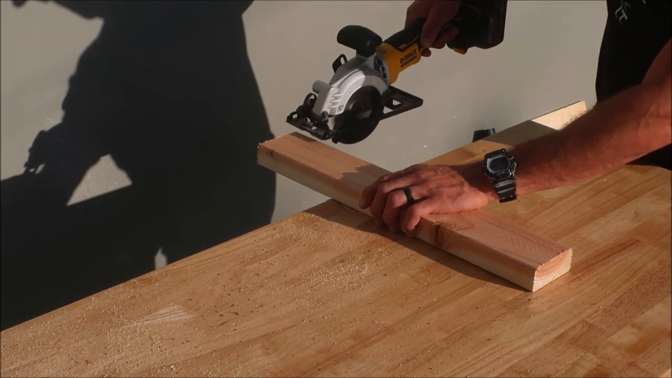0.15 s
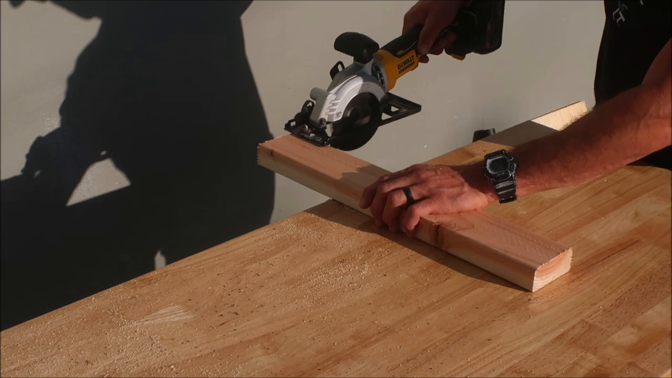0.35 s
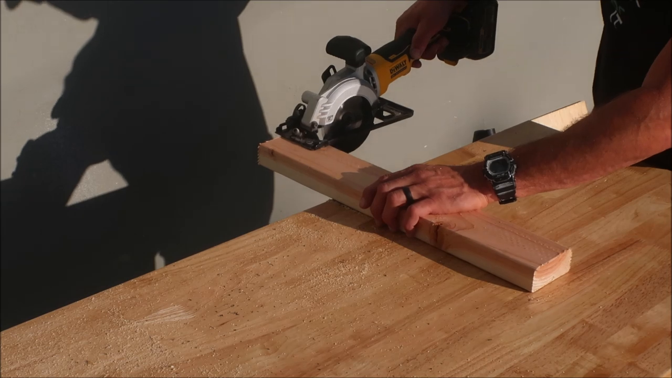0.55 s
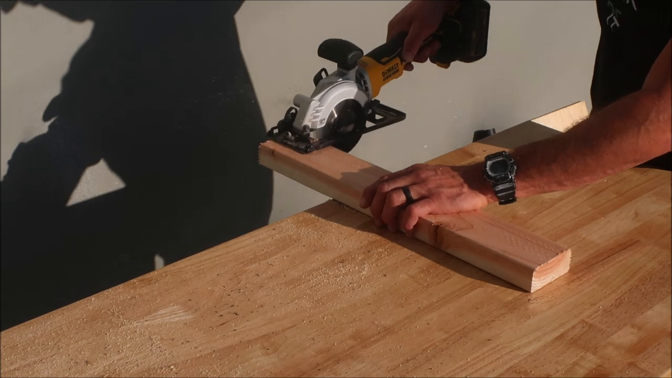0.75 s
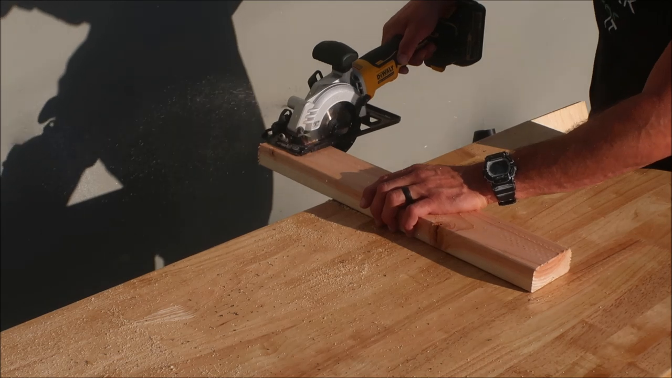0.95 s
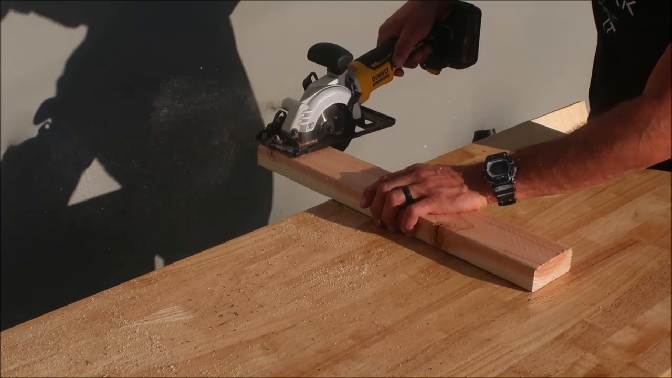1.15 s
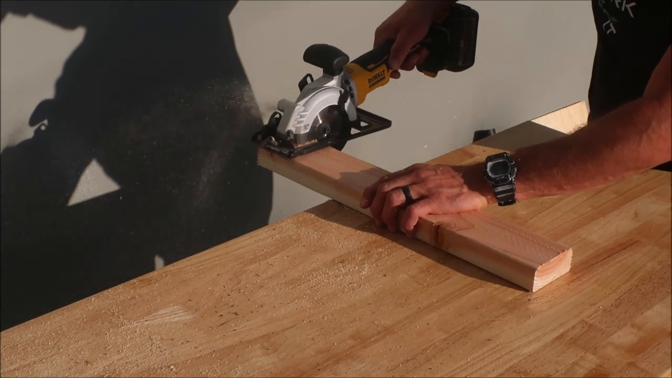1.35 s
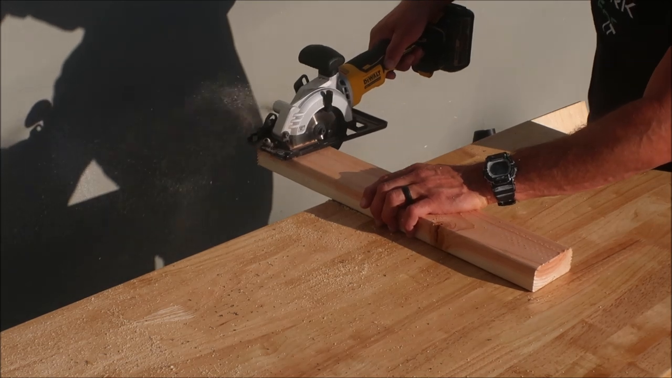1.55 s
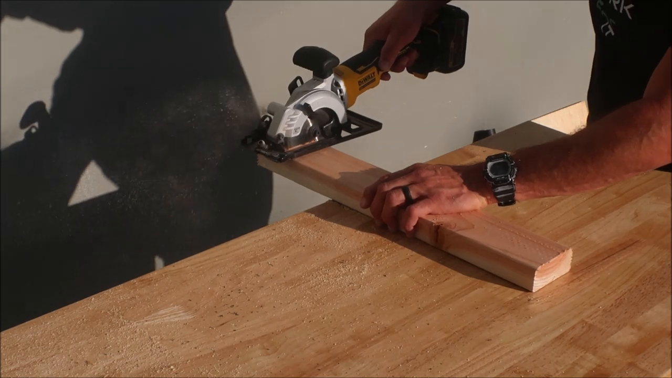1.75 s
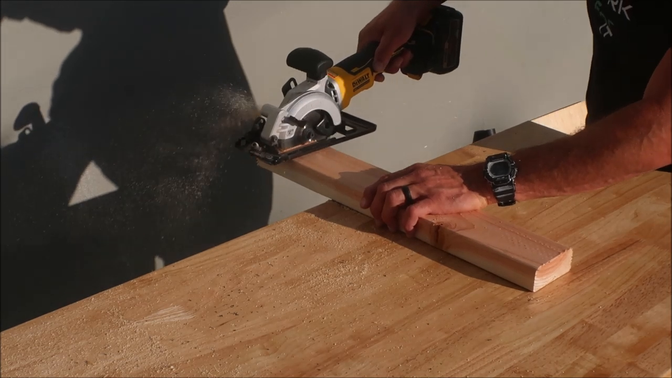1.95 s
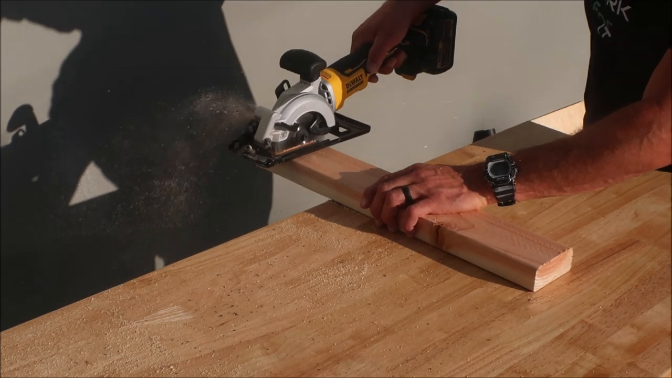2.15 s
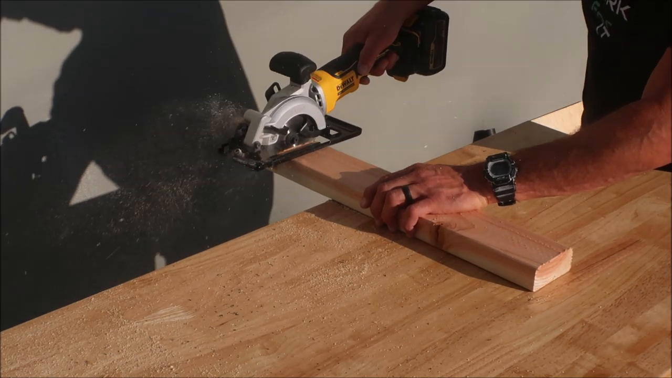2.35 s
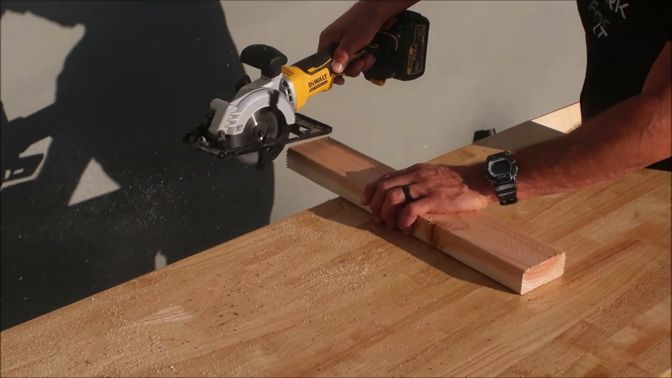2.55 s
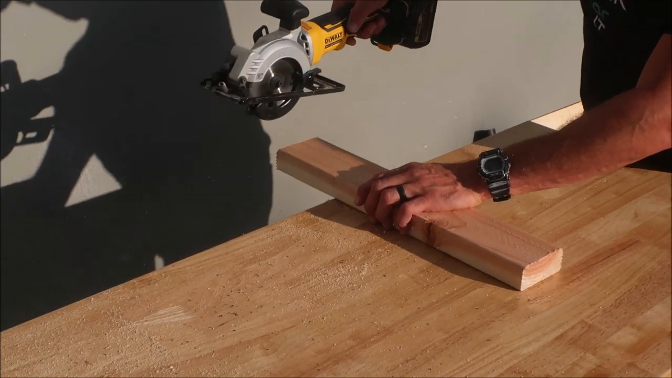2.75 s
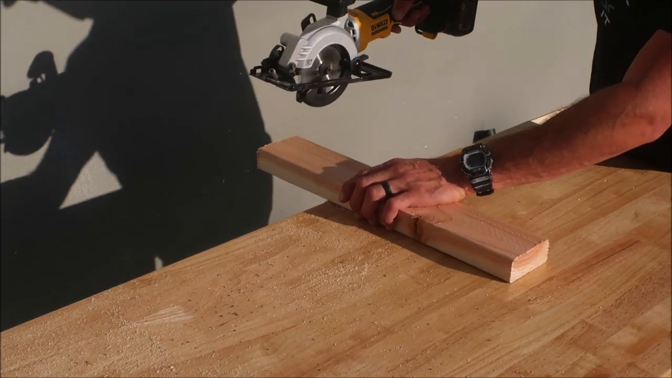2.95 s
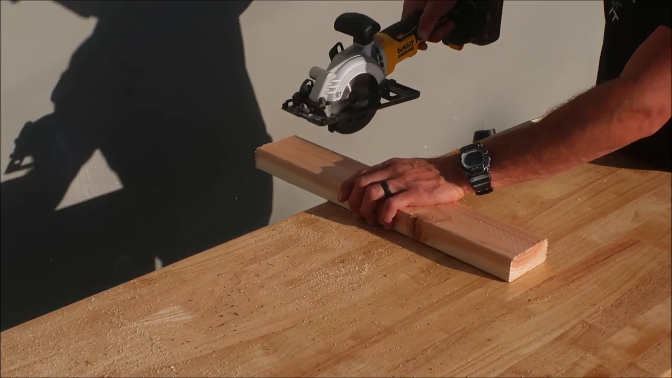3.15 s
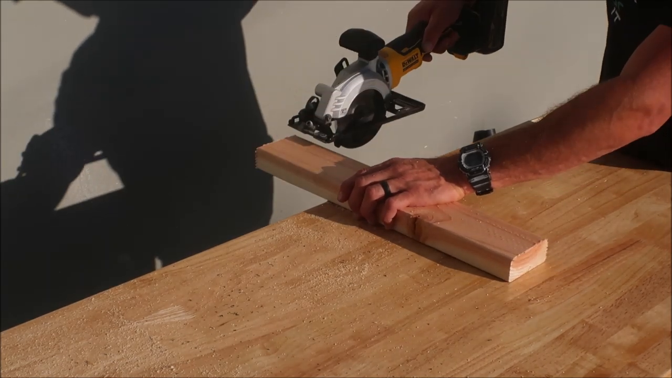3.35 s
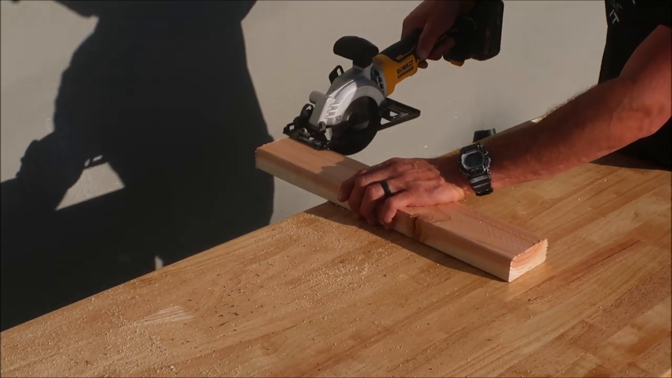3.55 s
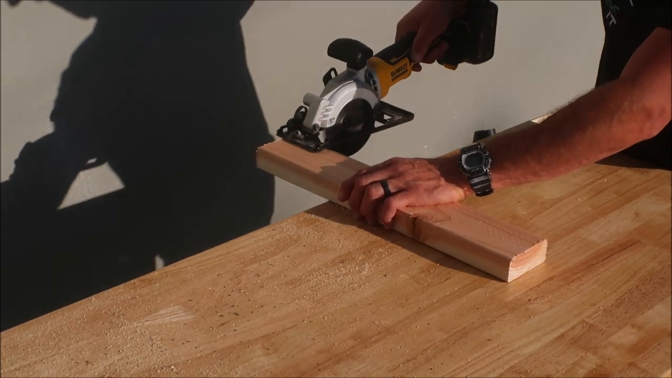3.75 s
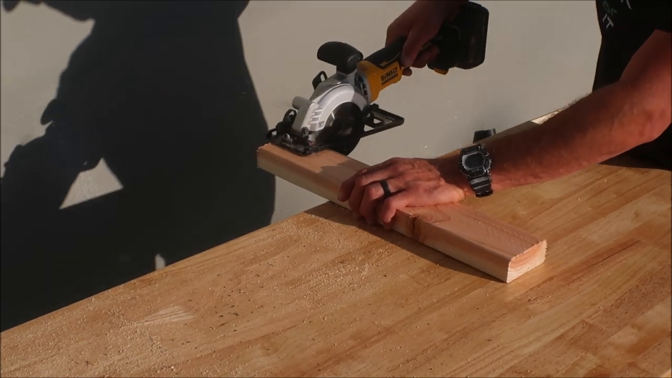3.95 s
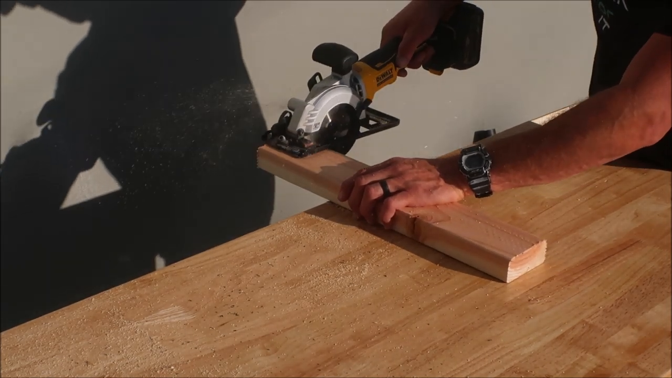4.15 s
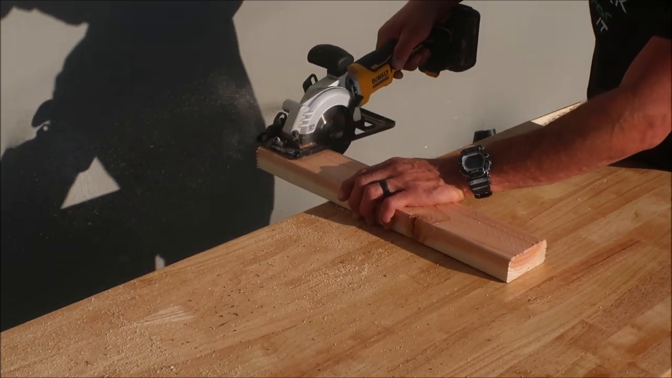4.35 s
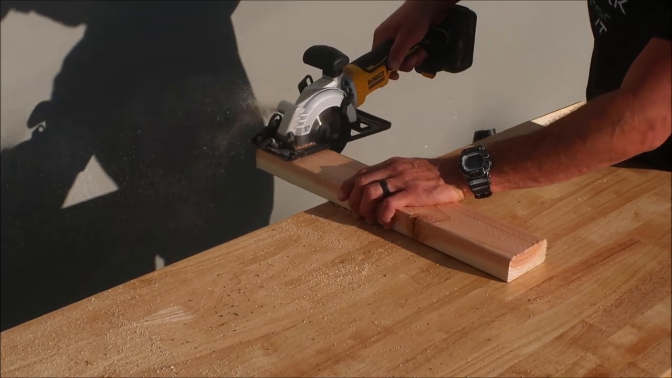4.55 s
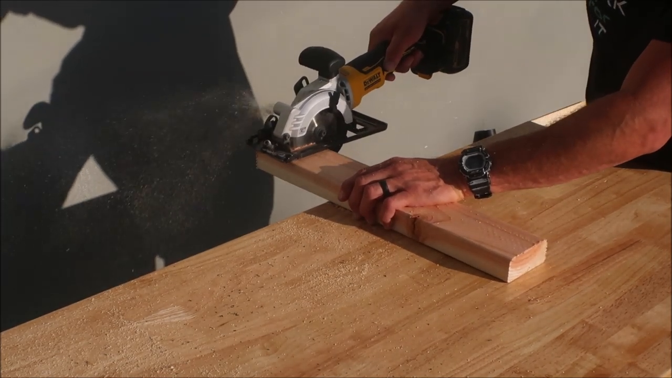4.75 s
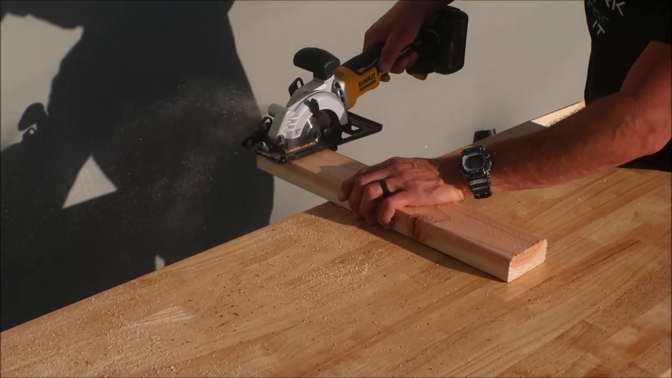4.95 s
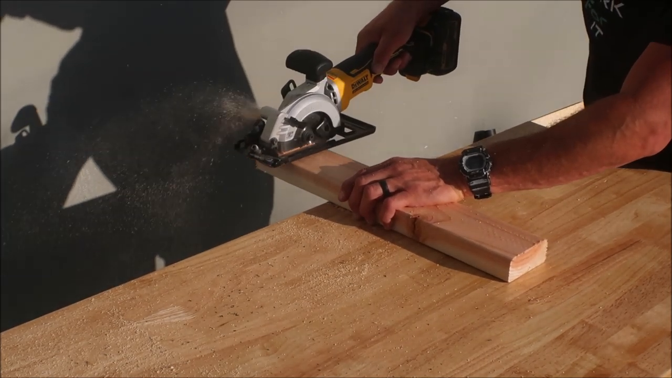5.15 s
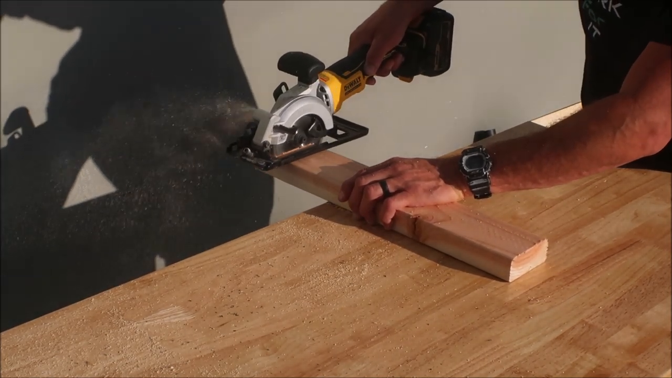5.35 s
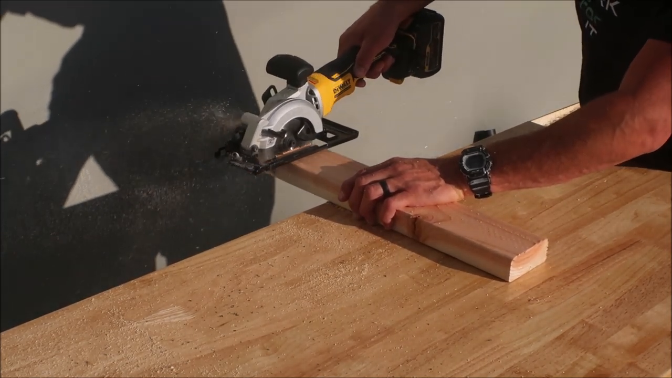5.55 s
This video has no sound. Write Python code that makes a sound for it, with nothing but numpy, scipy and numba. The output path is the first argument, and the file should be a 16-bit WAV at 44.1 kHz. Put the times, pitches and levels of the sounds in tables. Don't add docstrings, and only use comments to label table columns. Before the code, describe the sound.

Close, dry power saw: steady high motor whine and fan rush, two gritty metallic cuts through wood, quiet rumble of outdoor air underneath.

```python
import sys
import numpy as np
from scipy import signal
from scipy.fft import rfft, irfft, next_fast_len
from scipy.io import wavfile
from scipy.ndimage import uniform_filter1d, map_coordinates
from numba import njit

SR = 44100
rng = np.random.default_rng(int(sys.argv[2]) if len(sys.argv) > 2 else 0)


def magnitude_from_level(level_db):
    exponent = np.asarray(level_db, float) / 20
    return 10 ** exponent


def master_out(mix):
    frames = np.transpose(np.atleast_2d(mix))
    ceiling = np.clip(frames, -1, 1)
    pcm = np.round(ceiling * 32767).astype(np.int16)
    wavfile.write(sys.argv[1], SR, pcm)


N = 247401


def level(x, db=0):
    return x * magnitude_from_level(db) / np.sqrt(np.mean(x ** 2))


def between(pair, share):
    return pair[0] + (pair[1] - pair[0]) * share


def track(table, off_db=-100):
    t = np.arange(N) / SR
    single = isinstance(table[0], tuple)
    rows = np.array(table if single else sum(table, []), float)
    curve = np.interp(t, rows[:, 0], rows[:, 1])
    if off_db < 0 and not single:
        on = sum((t >= span[0][0]) & (t <= span[-1][0]) for span in table)
        curve = uniform_filter1d(np.where(on, curve, off_db), size=300)
    return curve


def swells(rows, edge_s):
    t = np.arange(N) / SR
    gain = np.zeros(N)
    for start, length, db in rows:
        inside = np.minimum(t - start, start + length - t)
        gain += magnitude_from_level(db) * np.clip(inside / edge_s + .5, 0, 1)
    return gain


def walk(rate_hz):
    step = int(SR / rate_hz)
    knots = 1.293 * rng.standard_normal(N // step + 2)
    return uniform_filter1d(np.interp(np.arange(N), step * np.arange(len(knots)), knots), step)


def colour(x, points):
    hz, db = np.transpose(points)
    size = next_fast_len(N)
    f = np.arange(size // 2 + 1) * SR / size + 1
    return irfft(rfft(x, size) * magnitude_from_level(np.interp(np.log(f), np.log(hz), db)), size)[:N]


@njit
def svf(x, hz, width):
    y, band, low = np.empty(len(x)), 0., 0.
    for i in range(len(x)):
        g, k = np.tan(np.pi * hz[i] / SR), width / hz[i]
        v = (band + g * (x[i] - low)) / (1 + g * (g + k))
        band, low, y[i] = 2 * v - band, low + 2 * g * v, k * v
    return y


def ring(force, modes, flicker_db):
    out = np.zeros((2, N))
    swell = [magnitude_from_level(flicker_db * walk(14)) for _ in range(5)]
    for k, (hz, width, db) in enumerate(modes):
        twice = np.array([np.hstack(signal.iirpeak(hz, hz / (w * width), SR)) for w in (.7, 3.5)])
        flicker = swell[k % len(swell)] ** min(hz / 5000., 1)
        out[int(hz > 3000)] += (-1) ** k * magnitude_from_level(db) * flicker * signal.sosfilt(twice, force)
    return out


# touch_s, free_s, squeal_db
CUTS = [
    (0.684, 2.427, -38),
    (3.931, 5.66, -31),
]


def since_touch():
    t = np.arange(N) / SR
    return t - np.where(t < CUTS[1][0] - .1, CUTS[0][0], CUTS[1][0])


def along(after_s, edge_s):
    gate = swells([(touch + after_s, free - touch - after_s, 0) for touch, free, _ in CUTS], edge_s)
    span = CUTS[0][1] - CUTS[0][0] - after_s
    return gate, np.clip((since_touch() - after_s) / span, 0, 1)


# time_s, level_db
FAN = [(0, -39), (.4, -37), (.64, -34.5), (1.0, -36.5), (1.3, -41.5), (2.0, -44), (2.4, -38.5),
       (2.56, -42.5), (2.59, -44), (2.63, -44), (2.73, -43.5), (2.79, -42), (3.35, -38.5), (3.92, -34),
       (4.3, -38), (4.6, -44), (5.0, -44), (5.61, -42)]


def fan_level_db():
    return track(FAN)


# time_s, bite_db
PUSH = [
    [(.67, -50), (.71, -38), (1.21, -35), (1.28, -45.5), (1.38, -42), (1.49, -37.5), (1.58, -40.5),
     (2.42, -41), (2.46, -65)],
    [(3.92, -66), (3.95, -35), (4.535, -34.5), (4.57, -44.5), (4.76, -37.5), (4.82, -38.5), (5.02, -37),
     (5.5, -39), (5.62, -43)],
]


def feed_db():
    return track(PUSH)


# pitch_hz, level_db
AIR_COLOUR = [(41, -40), (70, -0.5), (92, 3.5), (120, -1.5), (140, -6), (178, -4.5), (237, -9.5),
              (286, -5.5), (319, -16), (400, -11.5), (520, -42), (880, -120)]
# start_s, length_s, level_db
TRAFFIC = [(-.1, 0.88, -58.5), (.8, 0.29, -64), (2.0, 0.18, -66), (2.6, 0.14, -63), (3.0, 0.4, -64),
           (3.5, 0.14, -54), (3.75, 0.49, -58.5), (4.5, 0.63, -69), (5.3, .3, -64)]
# start_s, length_s, level_db
GUSTS = [(-.1, .85, -74.5), (2.9, 0.59, -72), (3.45, 1.0, -69), (5.1, .35, -69)]


def outdoor_air():
    draught = magnitude_from_level(-63 + 1.4 * (fan_level_db() + 39.5))
    rumble = level(colour(rng.standard_normal(N), AIR_COLOUR), 0.5)
    rumble *= np.hypot(draught, swells(TRAFFIC, edge_s=.15)) * magnitude_from_level(2.0 * walk(11) + 1.1 * walk(5.1))
    gust_colour = [(15, -19), (30, -10), (55, 2), (70, -23), (100, -43)]
    gust = level(colour(rng.standard_normal(N), gust_colour))
    return rumble + (magnitude_from_level(-76) + swells(GUSTS, edge_s=0.32)) * gust


# time_s, pitch_hz
SPEED = [(0, 3540), (.69, 3523), (1.2, 3557), (1.84, 3529), (1.97, 3447), (2.18, 3075), (2.35, 3079),
         (2.42, 3230), (2.5, 3834), (2.55, 3812), (2.67, 3484), (2.8, 3550), (4.2, 3523), (4.5, 3532),
         (5.05, 3534), (5.4, 3177), (5.48, 3227), (5.61, 3480)]


def shaft_angle():
    sag_s = .07
    after = np.maximum(since_touch(), 0) / sag_s
    sag_hz = np.where(np.arange(N) / SR < CUTS[0][1], 170.04, 349.8)
    hz = track(SPEED) - sag_hz * after * np.exp(-after)
    return 2 * np.pi * np.cumsum(uniform_filter1d(hz, size=1500) * (1 + .0002 * walk(40))) / (8 * SR)


# time_s, level_db
WHINE_FREE = [(0, -37), (.5, -36), (.69, -30.5), (2.45, -48), (2.57, -40), (2.595, -55), (2.63, -40.5),
              (2.7, -47), (2.8, -37), (2.95, -40), (3.04, -36.5), (3.2, -40), (3.35, -51.5), (3.93, -32)]
# time_s, level_db
WHINE_CUT = [
    [(.69, -32), (.75, -37), (1.2, -37.5), (1.3, -47.5), (1.7, -44), (1.84, -34.5), (2.06, -42),
     (2.3, -29.5), (2.42, -37)],
    [(3.93, -32), (4.02, -36), (4.25, -42), (4.51, -30), (4.57, -53), (4.93, -48), (5.05, -35.5),
     (5.52, -33), (5.61, -45)],
]


def whine_level_db():
    cutting, _ = along(0, edge_s=.03)
    return between((track(WHINE_FREE), track(WHINE_CUT, off_db=0)), cutting)


# shaft_multiple, level_db (against the fan)
ORDERS_DB = [(3, -23), (9, -28), (12, -33), (16, -31.5), (19, -36)]
# start_s, length_s, level_db
HUM = [(.3, 0.46, -57), (.85, 0.32, -60), (3.5, 0.84, -66.5)]
# start_s, length_s, level_db
FLARES = [(1.85, 0.32, -52), (3.95, .17, -48), (5.575, .1, -41.5)]
# pitch_hz, level_db
FAN_COLOUR = [(200, -32), (300, -20), (600, -16), (1200, -9), (1800, -7), (2400, 1.5), (2800, -6),
              (3500, -5.5), (5000, -13.5), (6500, -20.5), (8000, -33.5), (10000, -33), (14500, -43.5)]
# pitch_hz, width_hz, level_db
FAN_BODY = [(2090, 48, 0), (2555, 90, -9), (3046, 170, 6.5), (4080, 100, 0)]


def motor(shaft, load):
    fan_db = fan_level_db()
    whine_db = whine_level_db() + (0.76 + 2.3 * load) * walk(45) - 3.4 * load * np.abs(walk(25))
    whine_db += 2.9 * load * np.sin(shaft / 6)
    lines = magnitude_from_level(whine_db) * np.sin(8 * shaft + 1.7 * load * walk(130))
    hum = (magnitude_from_level(-70.5) + swells(HUM, edge_s=0.093)) * magnitude_from_level(-2.5 + 2.5 * walk(15))
    lines += hum * np.sin(shaft + 0.95 * walk(12))
    for order, db in ORDERS_DB:
        lines += magnitude_from_level(db + fan_db + 1.9 * load + 5.3 * walk(9)) * np.sin(order * shaft + 0.37 * walk(30))
    flare = swells(FLARES, edge_s=.04) * magnitude_from_level(3 * walk(25.47))
    lines += flare * np.sin(12 * shaft + 0.66 * walk(90))
    air = colour(rng.standard_normal(N), FAN_COLOUR) * magnitude_from_level(1.43 * walk(40))
    body = ring(rng.standard_normal(N), FAN_BODY, flicker_db=-0.5).sum(axis=0)
    return np.sqrt(2) * lines + magnitude_from_level(fan_db) * (level(air, 0.6) + level(body, -9.5))


# start_s, peak_db, pitch_hz, t60_s, clatter_share
KNOCKS = [(2.626, -38, 1354, 0.12, 1.8), (2.645, -48, 1110, 0.051, 1.52), (2.864, -48.5, 1290, 0.11, 6.7),
          (3.248, -48, 696, 0.071, 4.1), (4.53, -33.5, 1302, 0.086, 0.46), (4.525, -23, 3270, 0.088, .3)]


def knocks():
    out = np.zeros(N)
    t = np.arange(6000) / SR
    for s, db, hz, t60, clatter in KNOCKS:
        fade = np.exp(-np.log(1000) * t / t60) * np.minimum(t / 0.00081, 1)
        band = signal.butter(2, (0.26 * hz, 2.2 * hz), "band", fs=SR, output="sos")
        clack = np.sin(2 * np.pi * hz * t) + 0.36 * np.sin(2 * np.pi * 1.1 * hz * t)
        clack += clatter * signal.sosfilt(band, rng.standard_normal(len(t)))
        out[int(s * SR):int(s * SR) + len(t)] += magnitude_from_level(db) * fade * clack
    return out


def offcut(force):
    gate, loose = along(1.067, edge_s=0.075)
    bending, bent = along(1.43, edge_s=.1)
    hz = between((1438, 1610), loose) + 25 * walk(8)
    hum = level(svf(force, hz, 90.) + 0.29 * svf(force, hz, 360.0), -2.0)
    hum *= gate * magnitude_from_level(between((-41.5, -41), loose) + 4.5 * bending + 1.5 * walk(13))
    flap = np.sin(2 * np.pi * np.cumsum(between((200, 173.5), bent)) / SR)
    flap_gain = bending * magnitude_from_level(between((-68, -57.5), bent) + 5.2 * walk(9.5))
    return hum + np.sqrt(2) * flap_gain * flap


# start_s, length_s, level_db
WOBBLE = [(.75, 0.43, -59), (1.7, 0.38, -64.5), (4.03, 0.25, -61), (4.7, 0.89, -66)]
# start_s, length_s, level_db
KERF = [(1.78, 0.34, -41.5), (2.3, 0.15, -39), (5.04, 0.057, -40), (5.25, 0.38, -42)]
# start_s, length_s, level_db
BENCH = [(.8, 0.31, -53), (2.41, 0.094, -49.5)]


def board(shaft, force, load):
    _, loose = along(1.067, edge_s=0.075)
    squeal = swells([(touch + 0.0086, .025, db) for touch, _, db in CUTS], edge_s=0.01)
    tooth = squeal + magnitude_from_level(feed_db() - 13.5 + 13.8 * loose + 5 * loose * walk(12))
    tone = np.sin(4 * shaft + 1.5 * load * walk(90)) + 0.25 * np.sin(12 * shaft + 2.0 * walk(65))
    out = np.sqrt(2) * tooth * magnitude_from_level(0.44 * walk(30)) * tone
    wobble = swells(WOBBLE, edge_s=0.15) * magnitude_from_level(1.34 * walk(8.38))
    out += np.sqrt(2) * wobble * np.sin(2 * shaft / 3 + .7 * walk(18))
    slot = level(svf(force, np.full(N, 2150.), 136.0))
    out += swells(KERF, edge_s=.06) * magnitude_from_level(2.4 * walk(20)) * slot
    out += swells(BENCH, edge_s=0.16) * level(svf(force, np.full(N, 525.), 24.0), -1.8)
    return out + offcut(force) + knocks()


def tooth_force(shaft):
    teeth = 24
    tooth = (4 * shaft / (2 * np.pi)).astype(int)
    count = np.arange(tooth[-1] + 1)
    chip = rng.standard_normal(len(count)) + 1.56 * rng.standard_normal(teeth)[count % teeth]
    strikes = np.diff(tooth, prepend=0) * (0.57 + chip[tooth])
    grit = 1.13 * rng.standard_normal(N)
    return (level(strikes) + grit) * magnitude_from_level(0.73 * np.sin(shaft / 6) + 1.04 * walk(45))


# pitch_hz, width_hz, level_db
BLADE_FREE = [(2630, 165, -1.0), (2980, 33, -30), (3258, 28, -13.5), (3907, 35, -1.5), (4304, 31, 2.0),
              (5070, 68, -11), (5310, 53.0, -8.5), (5680, 75, -13.0), (6460, 60, -15), (6766, 113, -7.5),
              (7250, 51, -13), (7660, 270, -20.5), (8515, 73, -21.5), (8760, 37, -14), (8900, 44, -22.0),
              (9560, 35, -13), (10060, 68, -26.0), (10380, 76, -20), (11450, 70, -15.0), (11800, 36, -17),
              (12420, 71, -17), (13100, 88, -37), (14000, 74, -14),
              (2471, 69, -0.5), (2696, 33, 0.5), (3020, 12, -35), (4372, 28, -1.5), (3480, 79, -5.5),
         (3243, 49, -3.5), (5073, 47, -17.5)]
# pitch_hz, width_hz, level_db
BLADE_BURIED = [(2532, 120, -1), (3110, 49, -0.5), (4300, 46, -9.5), (5340, 87, -14.5), (6270, 91, -19.5),
                (6230, 38, -17.5), (6750, 58, -14), (7120, 30, -13), (8400, 54, -30), (8670, 61, -36),
                (9880, 49, -18.5), (10500, 45, -23), (10900, 46, -46), (12500, 120, -30), (13200, 180, -37),
                (14400, 240, -27), (15400, 64, -38)]
# pitch_hz, level_db
SHEAR = [(350, -74), (600, -21), (1180, -17), (1960, -15.5), (2540, 2), (2900, -14), (3320, -6),
         (6780, -17.5), (8990, -32), (9360, -19), (10200, -26.5), (13700, -30.5), (15000, -15.5)]
# start_s, length_s
LIFT = [(0.74, 0.029), (4.108, 0.053)]
# start_s, length_s, level_db
CHATTER = [(.7, 0.038, -22.5), (.835, 0.019, -23), (.945, .03, -36), (1.01, .07, -28), (1.11, 0.14, -28),
           (1.4, 0.04, -27.5), (1.465, 0.09, -26.5), (1.765, 0.073, -31), (1.855, 0.016, -27),
           (1.93, 0.028, -29), (2.06, 0.072, -32), (2.3, .1, -32.5), (2.42, 0.077, -37), (4.03, 0.087, -29),
           (4.205, 0.043, -27), (4.28, 0.262, -29), (4.655, 0.033, -28.5), (4.697, 0.026, -26),
           (4.73, 0.061, -24.5), (4.89, 0.056, -29), (5.01, 0.14, -32.5), (5.27, 0.018, -46),
           (5.4, 0.16, -31.5)]


def blade(force, depth):
    free = ring(force, BLADE_FREE, flicker_db=2.0)
    grip = np.clip(since_touch() / .8, 0, 1) ** 2
    faster = np.cumsum(1 + between((-.006, .015), grip)) % (N - 1)
    free = [map_coordinates(part, [faster], order=3) for part in free]
    buried = ring(force, BLADE_BURIED, flicker_db=3.0)
    shear = level(colour(force, SHEAR))
    shear_low = colour(shear, [(2800, -9.5), (3400, -39)])
    out_share, in_share = np.sqrt(1 - depth), np.sqrt(depth)
    low = out_share * level(free[0], -2.3) + in_share * level(buried[0], -8)
    low += magnitude_from_level(-6 + 8.7 * depth) * shear_low
    high = out_share * level(free[1], 2.32) + in_share * level(buried[1], -0.79)
    high += magnitude_from_level(-4.0 + 8.6 * depth) * level(shear - shear_low)
    lift = swells([(s, length, 0) for s, length in LIFT], edge_s=0.0069)
    bite = magnitude_from_level(feed_db()) * (1 - 0.42 * lift)
    chatter = swells(CHATTER, edge_s=0.022)
    low *= np.hypot(magnitude_from_level(3.5 + 1.6 * walk(24.74)) * bite, chatter)
    return low + high * np.hypot(bite, magnitude_from_level(-16) * chatter)


# pitch_hz, level_db
PORTS = [(60, -51), (110, -32), (200, -26), (380, -14.5), (700, -23.5), (1290, -25.5), (2380, -22),
         (4400, -11.5), (8120, 0.5), (15000, -2)]


def ports(mid):
    scatter = rng.standard_normal(4000) * np.exp(-np.arange(4000) / (0.02 * SR))
    scattered = signal.fftconvolve(mid, scatter / np.linalg.norm(scatter))[:N]
    side = colour(scattered, PORTS)
    return np.array([mid + side, mid - side])


def scene():
    shaft = shaft_angle()
    force = tooth_force(shaft)
    depth = np.clip((since_touch() - 0.65) / (1.45 - 0.65), .02, .95)
    cutting, _ = along(0, edge_s=0.038)
    load = cutting * (0.11 + 1.13 * depth)
    return ports(outdoor_air() + motor(shaft, load) + board(shaft, force, load) + blade(force, depth))


def roll_off(x):
    return signal.sosfilt(signal.butter(12, 15760, fs=SR, output="sos"), x)


# pitch_hz, level_db
DIPS = [(8950, -0.5), (9220, -3), (9550, -24), (9700, -2), (10650, -1), (10900, -16), (11150, 1),
        (11800, -8.5), (11950, -12), (12100, 0.5), (14850, -3.5), (15050, -30), (15400, -45), (15600, -45)]


def record(dry):
    heard = np.array([colour(port, DIPS) for port in dry])
    return roll_off(heard)


dry = scene()
out = record(dry)
master_out(out)
```